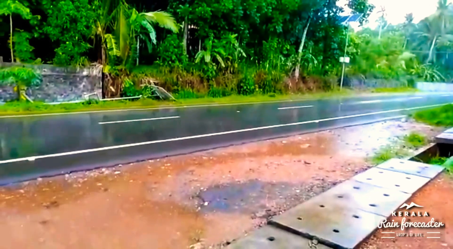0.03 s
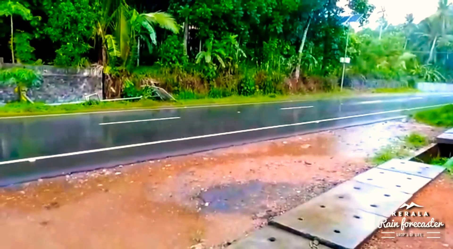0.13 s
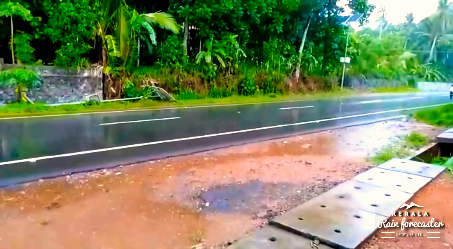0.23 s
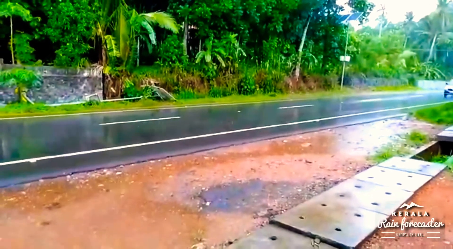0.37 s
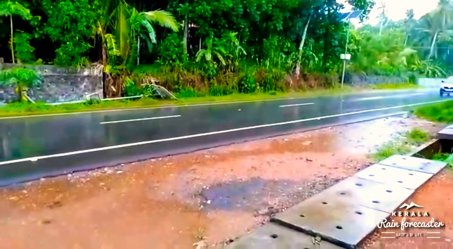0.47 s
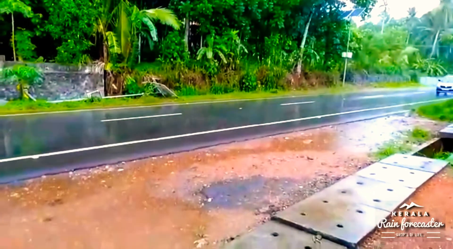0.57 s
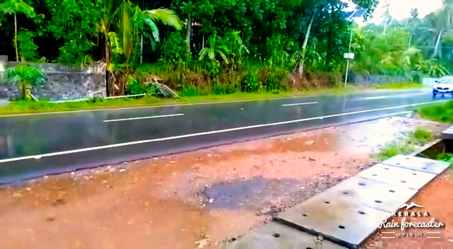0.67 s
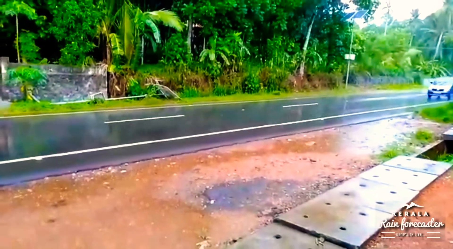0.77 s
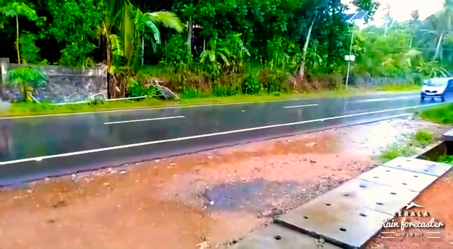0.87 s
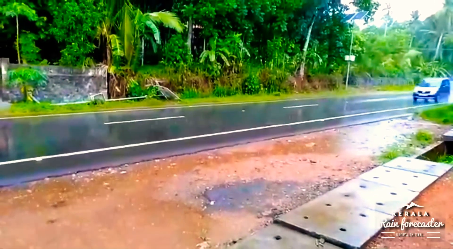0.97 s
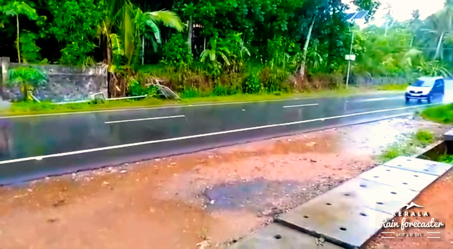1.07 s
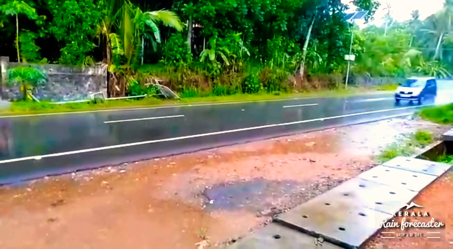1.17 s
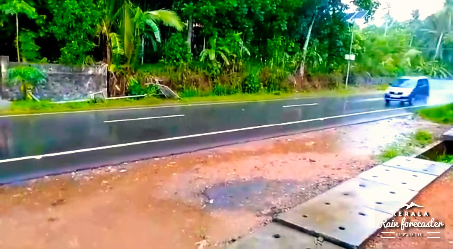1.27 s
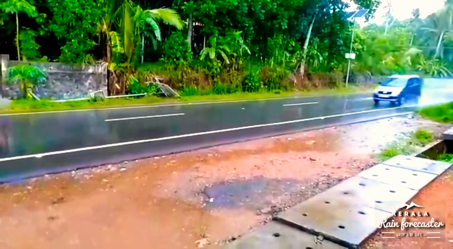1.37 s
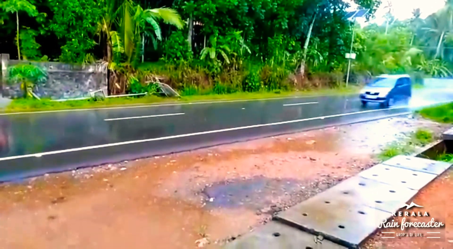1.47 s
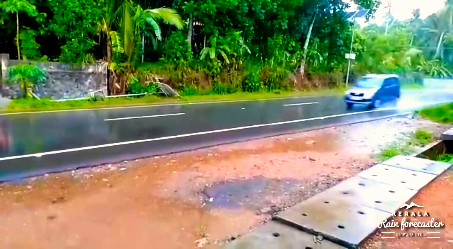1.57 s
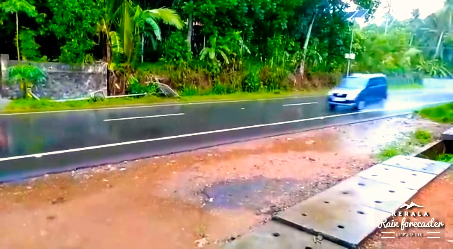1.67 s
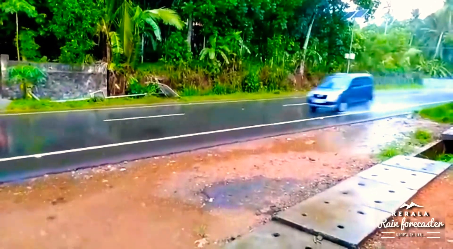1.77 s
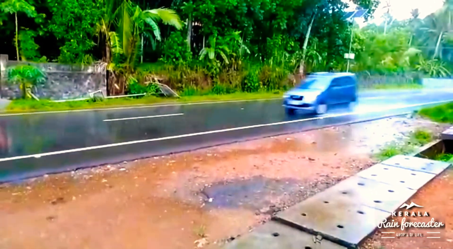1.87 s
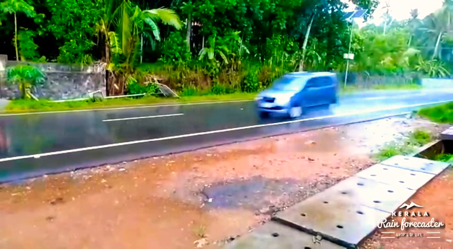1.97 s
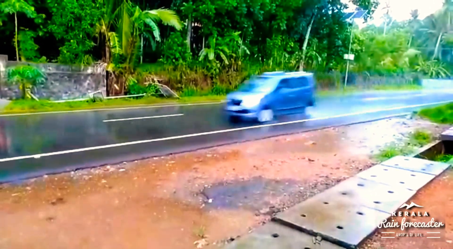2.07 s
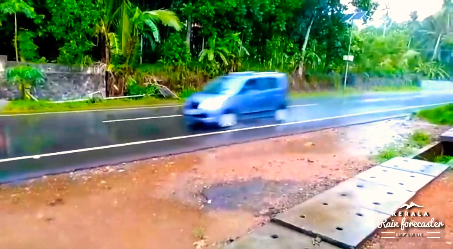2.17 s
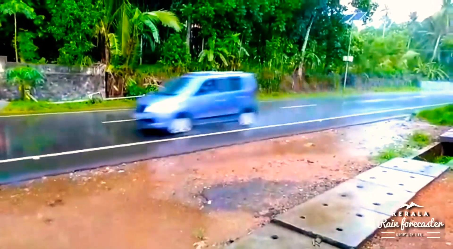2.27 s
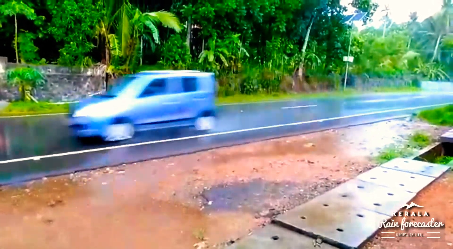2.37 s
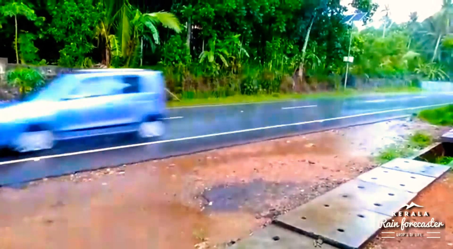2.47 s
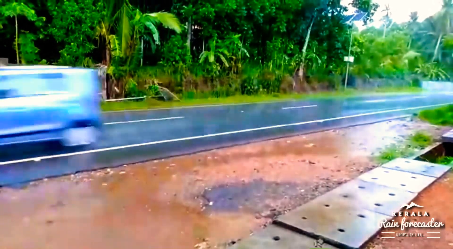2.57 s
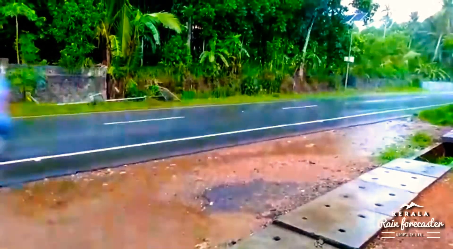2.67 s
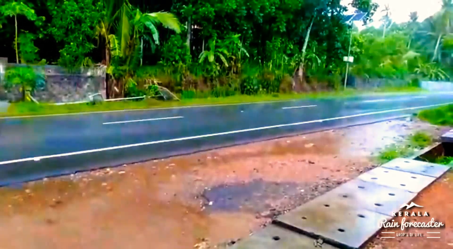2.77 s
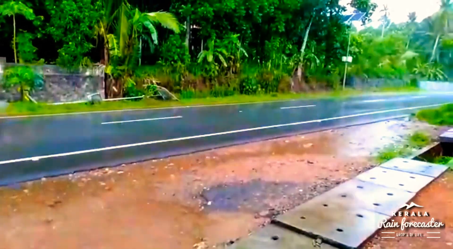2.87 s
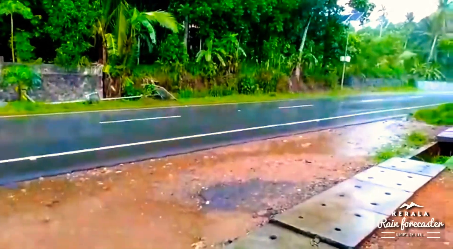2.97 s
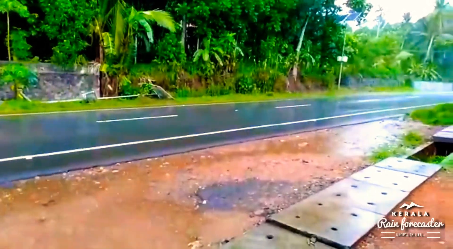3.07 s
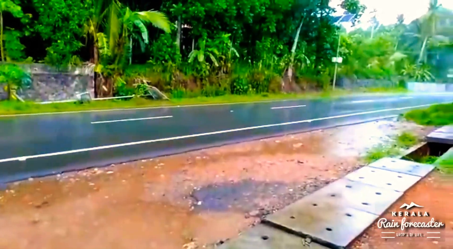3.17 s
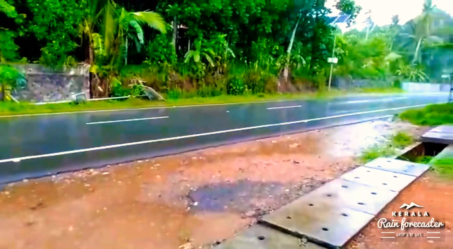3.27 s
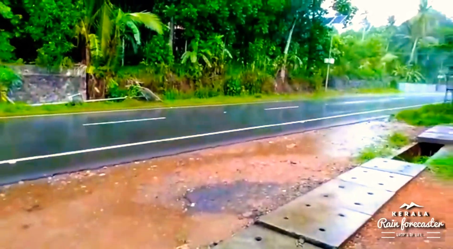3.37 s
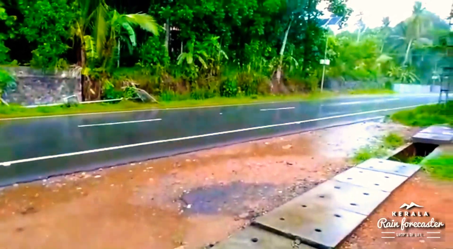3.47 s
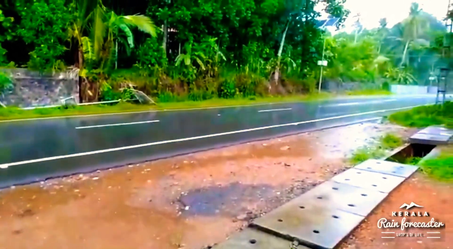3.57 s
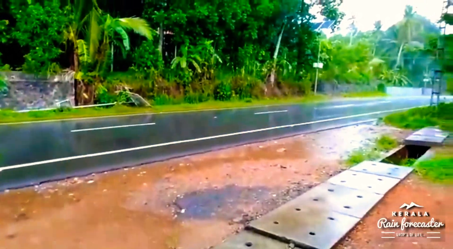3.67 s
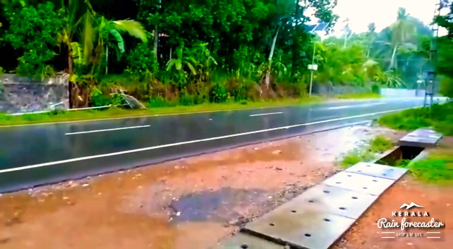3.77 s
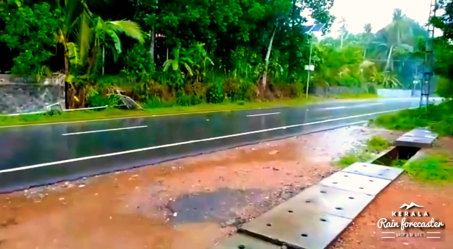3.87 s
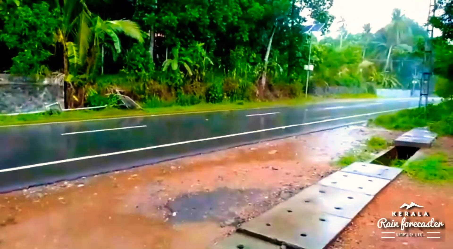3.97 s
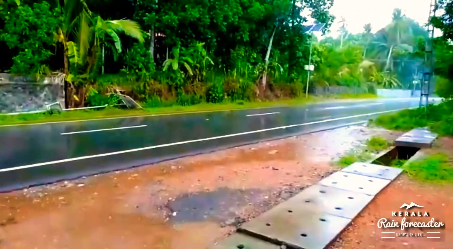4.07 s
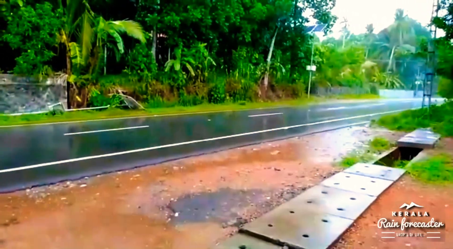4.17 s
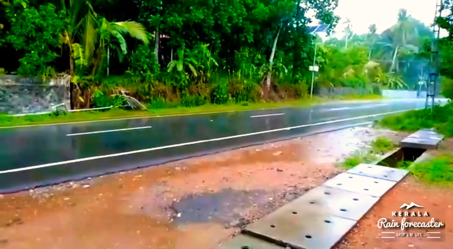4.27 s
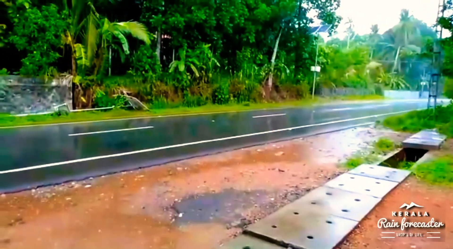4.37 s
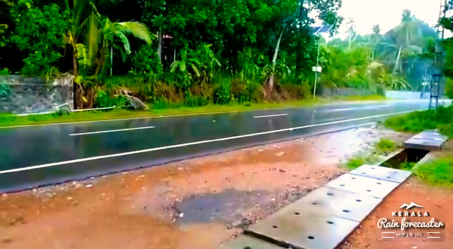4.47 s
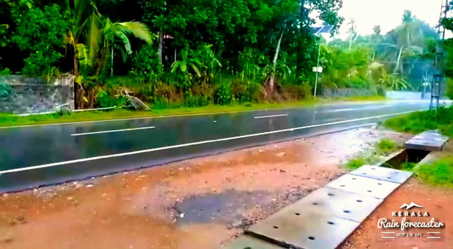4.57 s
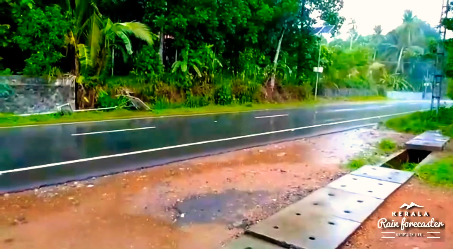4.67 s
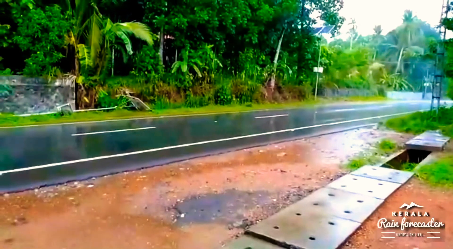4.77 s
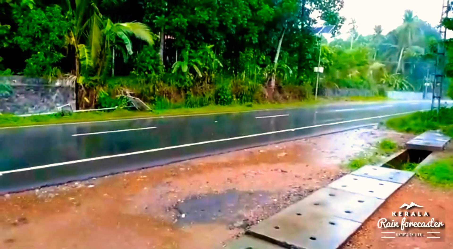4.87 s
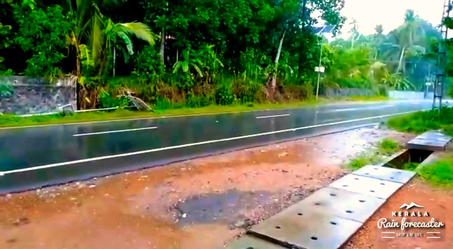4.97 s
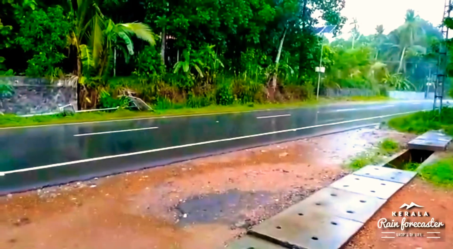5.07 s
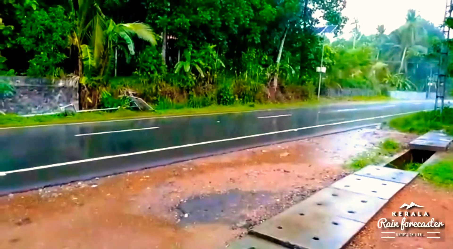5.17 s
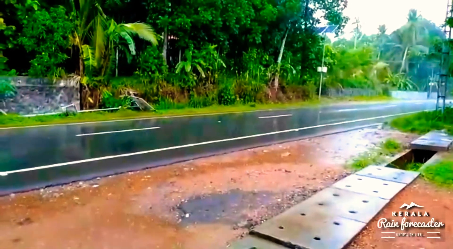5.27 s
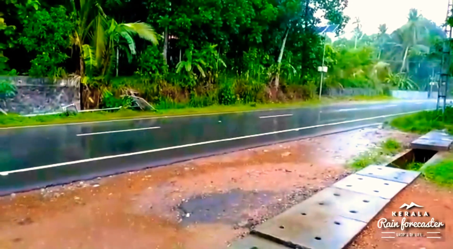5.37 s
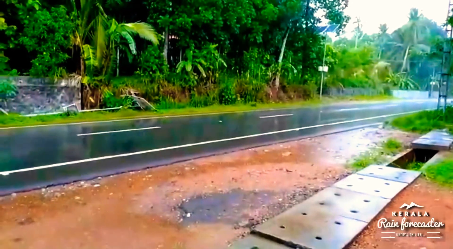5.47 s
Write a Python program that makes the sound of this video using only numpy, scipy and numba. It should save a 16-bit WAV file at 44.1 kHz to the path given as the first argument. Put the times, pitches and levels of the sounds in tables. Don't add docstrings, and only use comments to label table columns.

```python
import sys
import numpy as np
from scipy import signal
from scipy.fft import rfft, irfft, next_fast_len
from scipy.io import wavfile
from scipy.ndimage import uniform_filter1d
from numba import njit

SR = 44100
rng = np.random.default_rng(int(sys.argv[2]) if len(sys.argv) > 2 else 0)


def nominal_scale(level):
    x = np.asarray(level, float) / 20
    return 10 ** x


def int16_out(signal):
    q = np.round(np.clip(np.atleast_2d(signal).T, -1, 1) * 32767)
    wavfile.write(sys.argv[1], SR, q.astype(np.int16))


N = 244110
TIME_S = np.arange(N) / SR


def level(x, db):
    return x * nominal_scale(db) / np.sqrt(np.mean(x ** 2))


def colour(x, points):
    size = next_fast_len(N)
    hz, db = np.transpose(points)
    octave = np.log2(np.fft.rfftfreq(size, 1 / SR) + 1)
    below = np.maximum(np.log2(hz[0]) - octave, 0)
    above = np.maximum(octave - np.log2(hz[-1]), 0)
    gain = nominal_scale(np.interp(octave, np.log2(hz), db) - 23 * (below + above))
    return level(irfft(rfft(x, size) * gain, size)[:N], 0)


def rise(s, spread_s):
    return .5 + .5 * np.tanh((TIME_S - s) / (2 * spread_s))


def curves(table):
    s, *columns = np.transpose(table)
    return [np.interp(TIME_S, s, c) for c in columns]


def walk(rate_hz):
    k = int(SR / rate_hz)
    held = np.repeat(rng.standard_normal(N // k + 1), k)
    return 1.3 * uniform_filter1d(uniform_filter1d(held, k), k)[:N]


def drops(rate_hz, spread_db):
    draws = rng.random((8 * N // 50, 3))[:int(rate_hz * N / SR)]
    when, size, sign = draws.T
    size_db = -spread_db * np.log(np.maximum(size, .03))
    return level(np.bincount((when * N).astype(int), nominal_scale(size_db) * np.sign(sign - .5), N), 0)


# flank at once, tail slowly; start_s [s], spread_s [s], rear_share [0-1]
TURN = [
    (1.84, 0.03, 0.54),
    (3.05, 0.37, 0.51),
]


def turn():
    return np.clip(sum(share * rise(s, spread_s) for s, spread_s, share in TURN), 0, 1)


def wash(points, grain_share, rate_hz, spread_db, slow_db, quick_db, rear=None):
    share = np.clip(grain_share, 0, 1)
    merged = np.sqrt(1 - share) * rng.standard_normal(N)
    water = merged + np.sqrt(share) * drops(rate_hz, spread_db)
    sound = colour(water, points)
    if rear:
        sound = sound + turn() * (colour(water, rear) - sound)
    return sound * nominal_scale(slow_db * walk(11) + quick_db * walk(21.92))


def echo(x, delay_ms, share):
    return share * np.interp(np.arange(N) - delay_ms * SR / 1000, np.arange(N), x)


@njit
def svf(x, hz, width_hz):
    y, band, low = np.empty(len(x)), 0., 0.
    for i in range(len(x)):
        g, k = np.tan(np.pi * hz[i] / SR), width_hz[i] / hz[i]
        v = (band + g * (x[i] - low)) / (1 + g * (g + k))
        band, low, y[i] = 2 * v - band, low + 2 * g * v, k * v
    return y


# pitch_hz [Hz], level_db [dB per Hz]
RAIN_COLOUR = [(250, -10), (450, -6.5), (750, 0), (1300, 0), (2200, -0.5), (3000, -7.5), (5200, -18.5),
               (8000, -46), (11000, -23), (16100, -25)]
RAIN_DB = -43


def rain():
    return nominal_scale(RAIN_DB) * wash(RAIN_COLOUR, 0.072, 3500, 4.4, 0.14, 0.57)


# pitch_hz [Hz], level_db [dB per Hz]
TRAFFIC_COLOUR = [(18, 8), (27, -1), (38, 0), (50, 7.5), (80, 1.5), (120, 4.5), (200, -3), (300, -16),
                  (500, -13.5)]
FAR_DB, FAR_EARLY_DB, FAR_ARRIVES_S, FAR_SWELL_DB = -48.5, -0.5, 1.2, .7


def traffic():
    level_db = FAR_DB + FAR_EARLY_DB * (1 - rise(FAR_ARRIVES_S, .15)) + FAR_SWELL_DB * walk(5)
    return nominal_scale(level_db) * wash(TRAFFIC_COLOUR, 0, 500, 2, .4, 0.1)


# pitch_hz [Hz], level_db [dB re body rumble]
ENGINE_TONES = [
    (50, -4),
    (202, -4),
]


def engine():
    turns = np.cumsum(1 + 0.0315 * walk(9)) / SR
    tones = sum(nominal_scale(db) * np.sin(2 * np.pi * hz * turns) for hz, db in ENGINE_TONES)
    return tones * nominal_scale(2.5 * walk(6))


# pitch_hz [Hz], level_db [dB per Hz]
RUMBLE_COLOUR = [(40, 7), (60, -5), (130, -19), (210, 5), (320, -4.5), (480, -9.5), (800, -14)]
BODY_1M_DB, BODY_FAR_DB = -30.5, -59


def body(metres):
    gain = np.hypot(nominal_scale(BODY_1M_DB - 6.5) / metres, nominal_scale(BODY_FAR_DB - 6.0))
    return (wash(RUMBLE_COLOUR, 0, 500, 2, 0.39, 0.23) + engine()) * gain


# pitch_hz [Hz], level_db [dB per Hz]
ROAR_FRONT_COLOUR = [(300, -9), (480, -9), (650, 1.5), (1000, -4), (1700, 2), (2400, -1.5), (2900, -14.5),
                     (4500, -2.5)]
ROAR_REAR_COLOUR = [(300, -5.5), (480, -7.5), (650, -4), (1000, -4.5), (1300, -3), (1800, -3), (2400, -3),
                    (2900, -5.5), (4500, -28)]
HORN_HZ, HORN_SAG, HORN_SAG_S = 720, .18, 2.18
HORN_CLIMB_OCT, HORN_CLIMB_S, HORN_CLIMB_SPREAD_S = 1.75, 2.68, .12
HORN_WIDTH, HORN_WIDENS = .22, 1.3
HORN_DB, HORN_FROM_S, HORN_TO_S, HORN_SHADED_S = 4, 1.58, 3.4, 2.44


def tread_roar(tyre_db):
    roar = wash(ROAR_FRONT_COLOUR, 0.11, 4000, 0.69, 0.34, 0.13, rear=ROAR_REAR_COLOUR)
    roar = roar * nominal_scale(tyre_db - 2.33)
    climb_oct = HORN_CLIMB_OCT * rise(HORN_CLIMB_S, HORN_CLIMB_SPREAD_S)
    horn_hz = HORN_HZ * (1 - HORN_SAG * rise(HORN_SAG_S, 0.041)) * 2 ** climb_oct
    width_hz = HORN_WIDTH * (1 + HORN_WIDENS * rise(HORN_CLIMB_S + .1, .07)) * horn_hz
    shade = 1 - np.exp(-((TIME_S - HORN_SHADED_S) / .07) ** 2)
    horn_db = HORN_DB * rise(HORN_FROM_S, .2) * (1 - rise(HORN_TO_S, .06)) * shade
    return roar + (nominal_scale(horn_db) - 1) * svf(roar, horn_hz, width_hz)


# start_s [s], extra_db [dB], length_s [s]
PUDDLE_SWELLS = [
    (0.247, 1.5, .04),
    (1.252, 3, 0.034),
    (1.604, 0.5, .04),
    (1.877, 5, 0.05),
    (2.004, 6, 0.045),
    (2.22, 3, 0.059),
    (2.863, 1, 0.12),
]


def puddles():
    return sum(db * np.exp(-((TIME_S - s) / length_s) ** 2) for s, db, length_s in PUDDLE_SWELLS)


# pitch_hz [Hz], level_db [dB per Hz]
HISS_FRONT_COLOUR = [(1800, -6), (2800, -0.5), (3600, 0.5), (4300, 0.5), (5200, 1.5), (7000, -2),
                     (8500, -5.5), (11000, -11)]
HISS_REAR_COLOUR = [(1800, -14), (2800, -8), (3600, 0), (4300, -2), (4800, -6.5), (5400, -9), (6000, -6.5),
                    (7000, -7.5), (8500, -14), (11000, -22)]
HISS_FRONT_DB, HISS_REAR_DB, PUDDLE_HISS_SHARE = 4.5, 0.15, .6
HISS_YIELDS_S = 1.43
WAKE_DB, WAKE_S = 2, 2.73


def water_hiss(tyre_db):
    late = rise(HISS_YIELDS_S, 0.22)
    hiss_db = tyre_db + (1 - late) * HISS_FRONT_DB + late * HISS_REAR_DB
    hiss_db = hiss_db + WAKE_DB * rise(WAKE_S, 0.088) + PUDDLE_HISS_SHARE * puddles()
    hiss = wash(HISS_FRONT_COLOUR, 0.11, 6000, 3.5, 0.12, 0.15, rear=HISS_REAR_COLOUR)
    return hiss * nominal_scale(hiss_db - 4.0)


# start_s [s], level_db [dB]
TYRE_LEVEL = [(0, -50), (.45, -45.5), (1.22, -37), (1.72, -33.5), (1.86, -34), (2.1, -33.5), (2.35, -32),
              (2.76, -32.5), (3.28, -34), (3.65, -38), (4.1, -42.5), (4.45, -45), (5.54, -48)]
PASSES_S, SPEED_M_S, KERB_M = 2.5, 21, 2.9
WALL_MS, WALL_FAR, WALL_NEAR = 1.65, 0.12, 0.027
GROUND_FRONT_MS, GROUND_REAR_MS, GROUND_SHARE = 1.226, 0.365, 0.03


def car():
    tyre_db = curves(TYRE_LEVEL)[0]
    metres = np.hypot(SPEED_M_S * (TIME_S - PASSES_S), KERB_M)
    direct = body(metres) + tread_roar(tyre_db) + water_hiss(tyre_db)
    wall = WALL_FAR + (WALL_NEAR - WALL_FAR) * np.sqrt(KERB_M / metres)
    ground_ms = GROUND_FRONT_MS + (GROUND_REAR_MS - GROUND_FRONT_MS) * rise(PASSES_S + 0.26, 0.15)
    heard = direct + echo(direct, WALL_MS, wall) + echo(direct, ground_ms, GROUND_SHARE)
    return heard / np.sqrt(1 + wall ** 2 + GROUND_SHARE ** 2)


# pitch_hz [Hz], level_db [dB per Hz]
SPRAY_FRONT_COLOUR = [(6500, 4), (8000, 3), (9200, -4.5), (10300, -17), (11300, -3), (12500, 3),
                      (14000, -7)]
SPRAY_REAR_COLOUR = [(6500, -4), (8000, -6.5), (9500, -2.5), (11000, -2), (12500, -2.5), (14000, -7)]
MIST_COLOUR = [(11500, -21), (13200, -12), (14200, 4), (15000, 2), (15600, 5), (16100, 1)]
# start_s [s], level_db [dB]
WATER_LEVEL = [(0, -50), (.5, -45.5), (1.25, -36.5), (1.6, -34.5), (1.75, -32), (1.85, -30), (2.38, -31.5),
               (2.5, -32.5), (2.87, -37), (3.1, -42.5), (3.58, -46), (4.3, -52), (5.54, -61)]
COARSE_FRONT_DB, COARSE_REAR_DB, PUDDLE_COARSE_SHARE = -6.5, -3, .5
COARSE_SLOPE = 0.96
COARSE_LAG_S, COARSE_SMEAR_S = .07, .3


def spray():
    water_db, rear = curves(WATER_LEVEL)[0], turn()
    peak_db = water_db.max()
    late_db = uniform_filter1d(echo(water_db, 1000 * COARSE_LAG_S, 1), int(COARSE_SMEAR_S * SR))
    coarse_db = COARSE_SLOPE * (late_db - peak_db) + peak_db
    coarse_db = coarse_db + (1 - rear) * COARSE_FRONT_DB + rear * COARSE_REAR_DB
    coarse_db = coarse_db + PUDDLE_COARSE_SHARE * puddles()
    coarse = wash(SPRAY_FRONT_COLOUR, 0.41, 6000, 3.6, .2, 1.0, rear=SPRAY_REAR_COLOUR)
    mist = wash(MIST_COLOUR, .3, 4000, 3, .2, 0.42)
    return coarse * nominal_scale(coarse_db - 3.0) + mist * nominal_scale(water_db + puddles() - 10)


# start_s [s], peak_db [dB]
SPLASH_HITS = [(0.2483, -32), (0.8116, -30), (0.9014, -29), (1.4147, -25), (1.5145, -24), (1.7055, -24.5),
               (1.8472, -19), (2.1914, -20), (2.5301, -22), (2.8524, -23), (4.4717, -34), (4.5047, -32),
               (4.6044, -31), (4.9277, -37)]


def splashes():
    s, peak_db = np.transpose(SPLASH_HITS)
    hits = np.zeros(N)
    hits[(s * SR).astype(int)] = nominal_scale(peak_db - 20)
    tail = np.exp(-np.arange(1024) / (0.0045 * SR))
    return signal.fftconvolve(hits, tail)[:N] * colour(rng.standard_normal(N), MIST_COLOUR)


# start_s [s], peak_db [dB], pitch_hz [Hz]
DRIP_RINGS = [
    (4.1094, -29, 1490),
    (4.3999, -31.5, 1370),
    (5.3494, -34, 2040),
]


def drips():
    out, t = np.zeros(N + 4096), np.arange(4096) / SR
    envelope = np.exp(-t / 0.013) * (1 - np.exp(-t / .002))
    for s, peak_db, hz in DRIP_RINGS:
        ring = np.sin(2 * np.pi * hz * t * (1 + 2.35 * t)) * envelope
        start = int(s * SR)
        out[start:start + len(t)] += nominal_scale(peak_db - 4.5) * ring
    return out[:N]


def shimmer(x, patchy_db, count_bins, count_frames):
    spec = signal.stft(x, nperseg=512)[2]
    field = uniform_filter1d(rng.standard_normal(spec.shape), count_bins, axis=0)
    field = uniform_filter1d(field, count_frames, axis=1)
    return signal.istft(spec * nominal_scale(patchy_db * field / field.std()), nperseg=512)[1][:N]


def scene():
    far = shimmer(car() + spray() + rain(), 1.6, count_bins=2, count_frames=8)
    return np.tile(far + splashes() + drips() + traffic(), (2, 1))


# start_s [s], band_share [0-1]
SIDE_BLOCKS = [(.165, .12), (.397, .25), (1.07, .5), (1.14, .12), (1.93, .12), (2.487, .2), (2.51, .4),
               (2.766, .25), (2.835, .2), (3.09, .45), (3.137, .25), (3.648, .12), (3.764, .12),
               (3.903, .12), (4.16, .2), (4.345, .4)]
SIDE_EDGES_HZ = np.geomspace(4200, 15700, 9)


def treble_side(mono):
    side, size = np.zeros(N), 2048
    band = np.searchsorted(SIDE_EDGES_HZ, np.fft.rfftfreq(size, 1 / SR))
    for s, share in SIDE_BLOCKS:
        block = slice(int(s * SR) - size // 2, int(s * SR) + size // 2)
        chosen = 1 + rng.permutation(len(SIDE_EDGES_HZ) - 1)[:round(share * 8)]
        phase = np.exp(2j * np.pi * rng.random(len(band)))
        noise = irfft(rfft(mono[block]) * np.isin(band, chosen) * phase)
        side[block] += noise * np.hanning(size) * nominal_scale(-2.0)
    return side


def band_limit(x):
    return signal.sosfilt(signal.butter(12, 17120, fs=SR, output="sos"), x)


# pitch_hz [Hz], width_hz [Hz], boost_db [dB]
PORT_RINGS = [
    (6700, 900, 9),
    (15650, 1700, 13),
]
TOP_HZ = 15760


def record(dry):
    out = dry
    for hz, width_hz, boost_db in PORT_RINGS:
        b, a = signal.iirpeak(hz, hz / width_hz, fs=SR)
        out = out + (nominal_scale(boost_db) - 1) * signal.lfilter(b, a, out)
    size = next_fast_len(N)
    out = irfft(rfft(out, size) * (np.fft.rfftfreq(size, 1 / SR) < TOP_HZ), size)[:, :N]
    out = out + np.array([[1], [-1]]) * treble_side(out[0])
    return band_limit(out)


dry = scene()
out = record(dry)
int16_out(out)
```